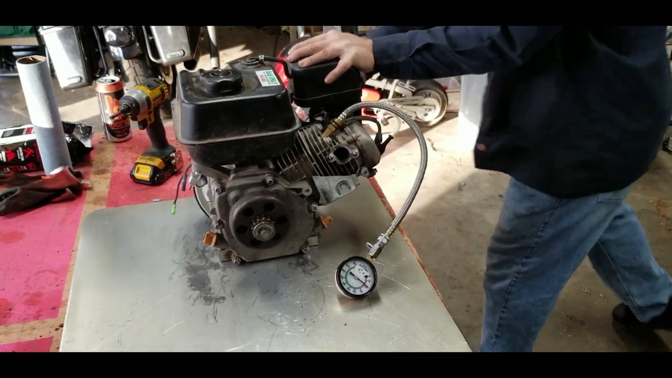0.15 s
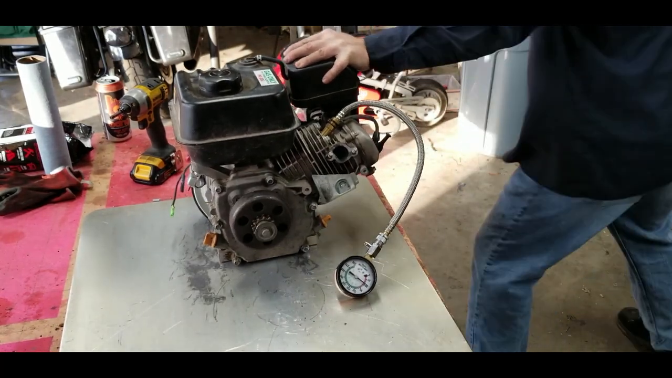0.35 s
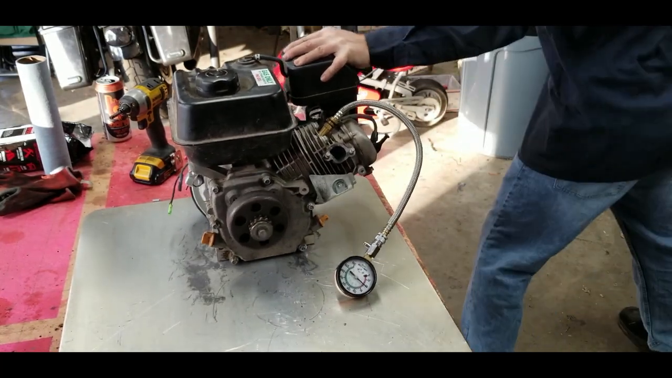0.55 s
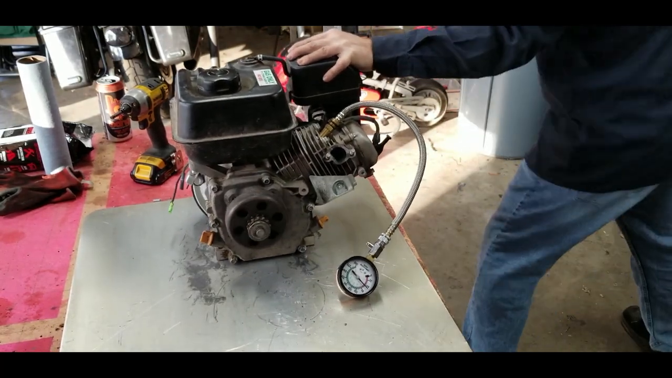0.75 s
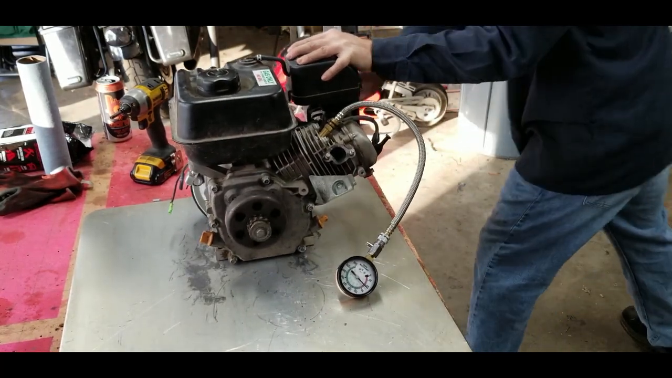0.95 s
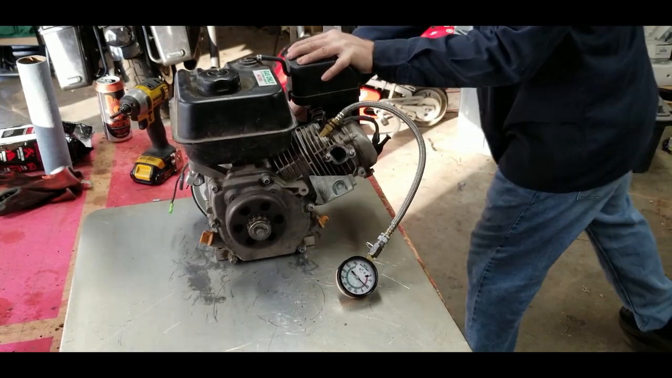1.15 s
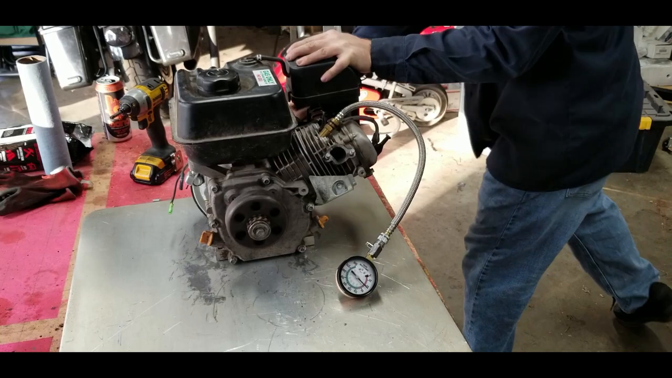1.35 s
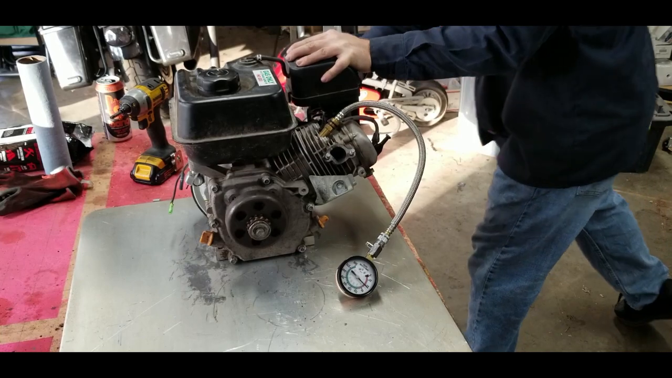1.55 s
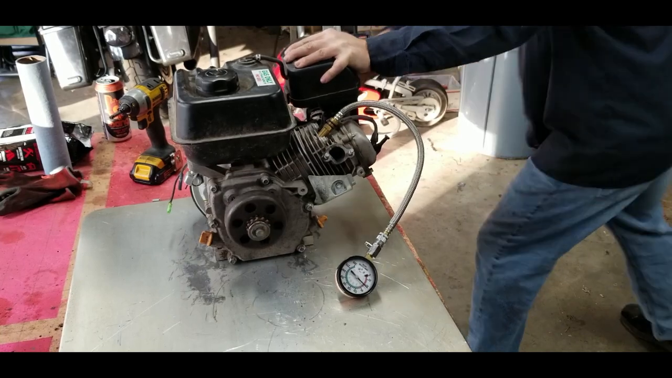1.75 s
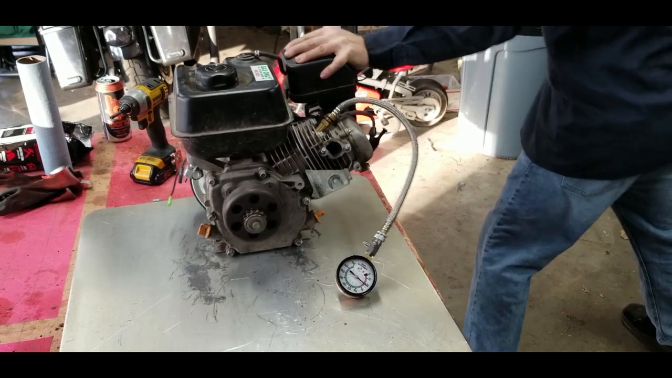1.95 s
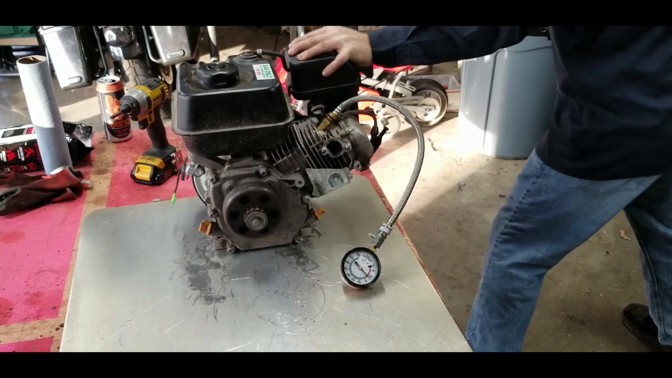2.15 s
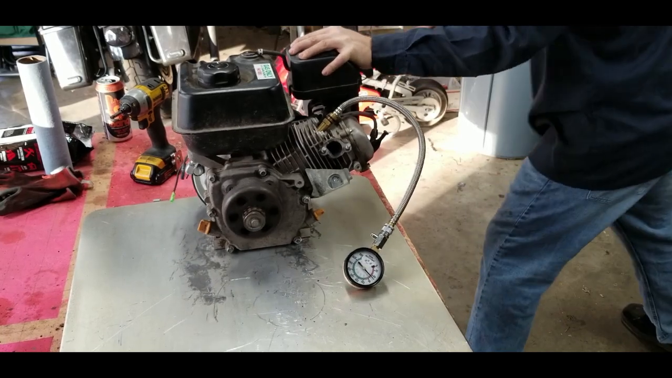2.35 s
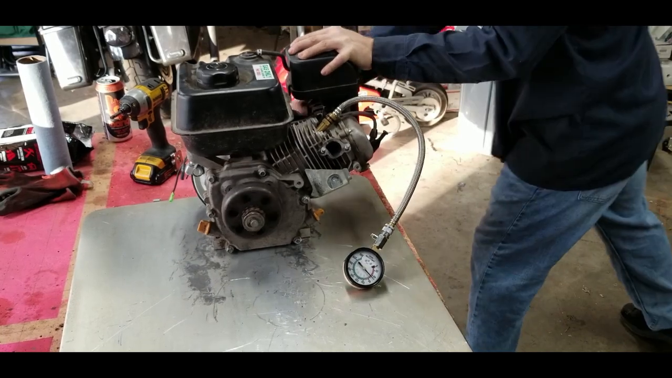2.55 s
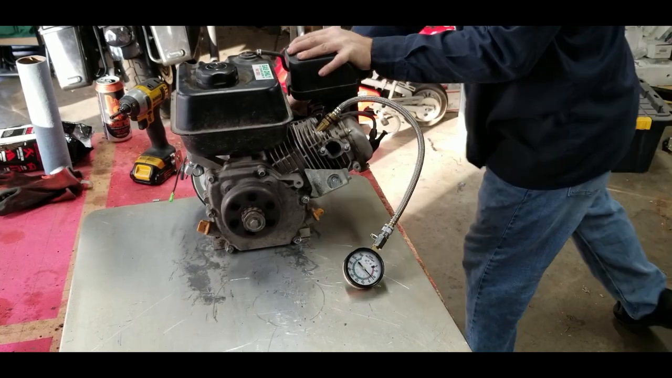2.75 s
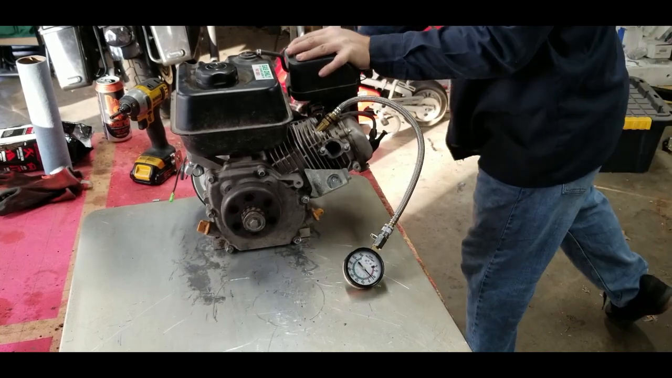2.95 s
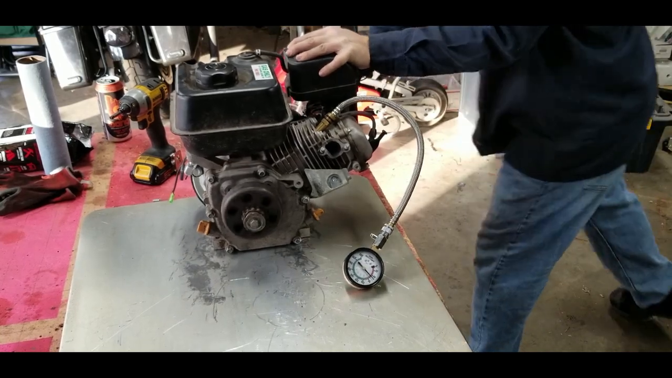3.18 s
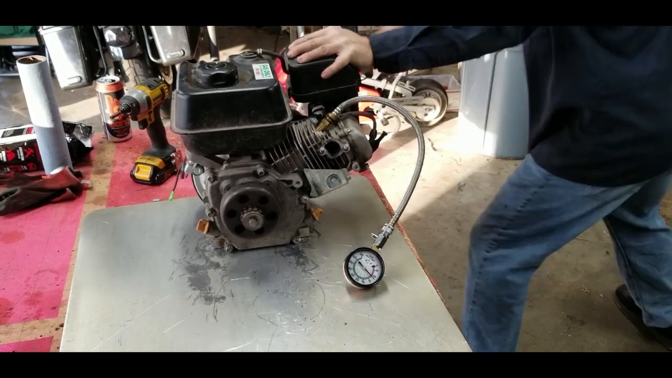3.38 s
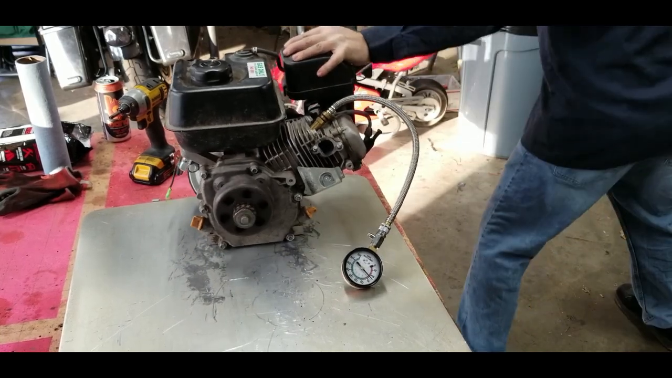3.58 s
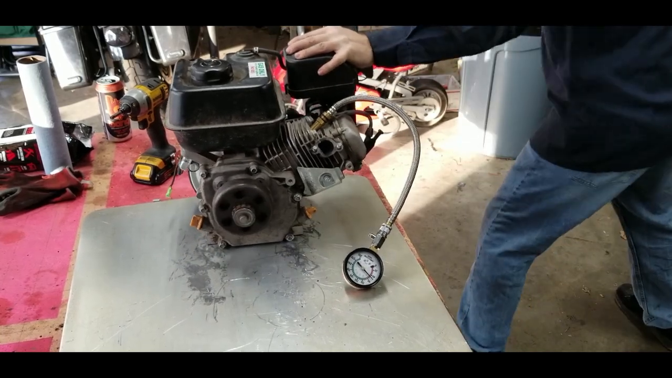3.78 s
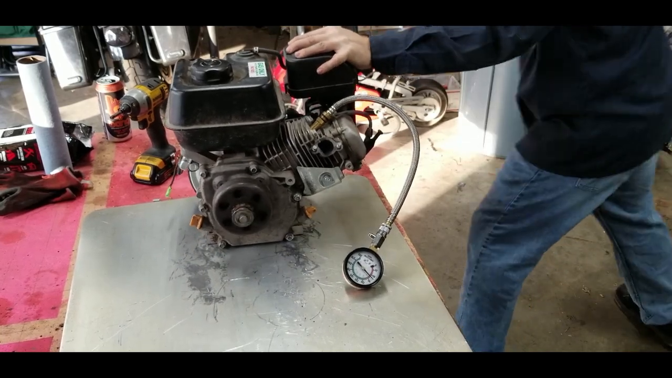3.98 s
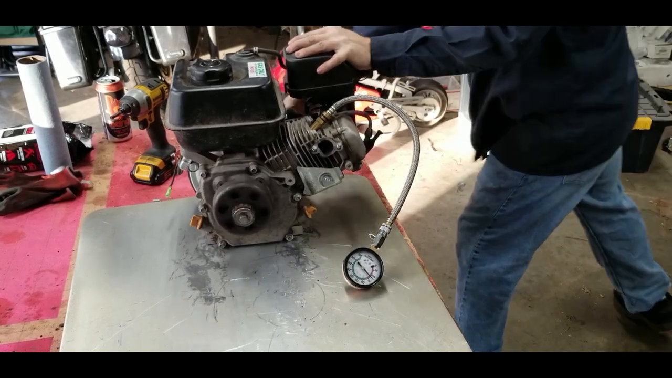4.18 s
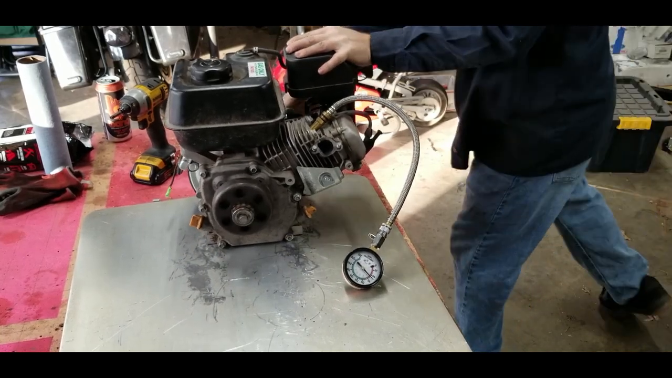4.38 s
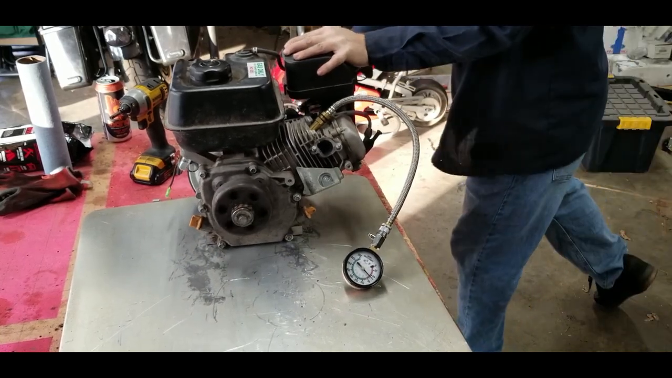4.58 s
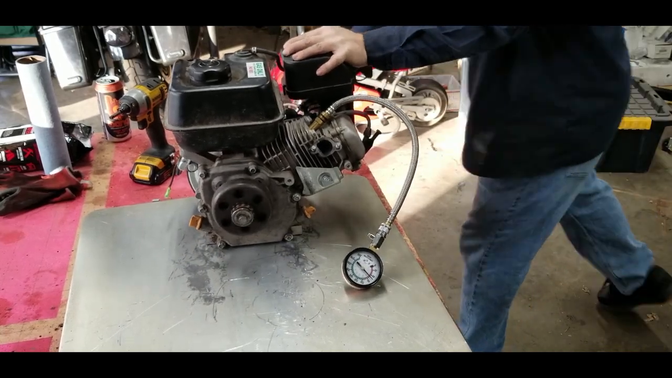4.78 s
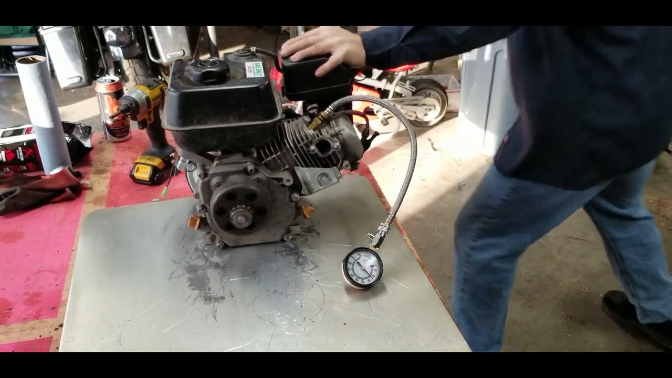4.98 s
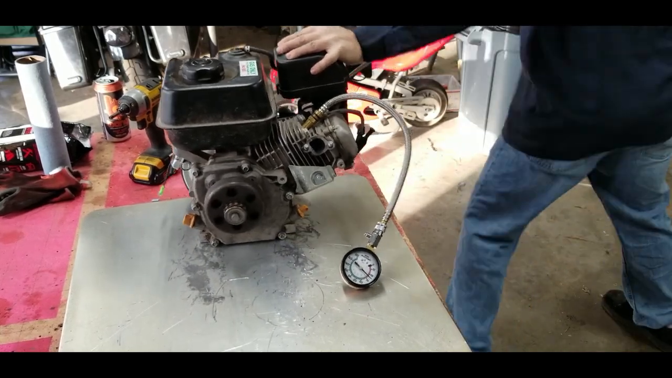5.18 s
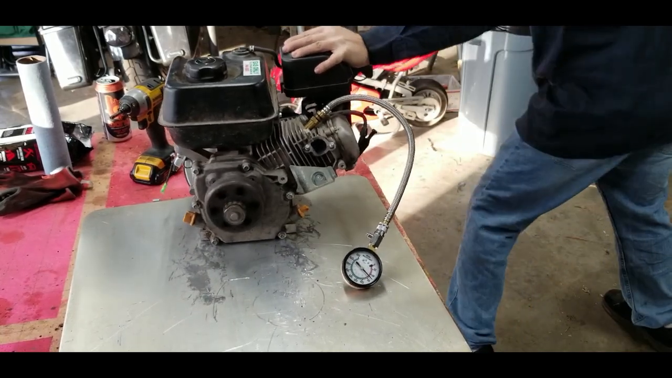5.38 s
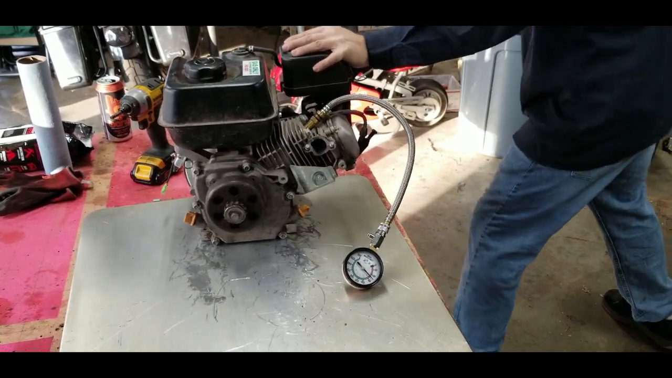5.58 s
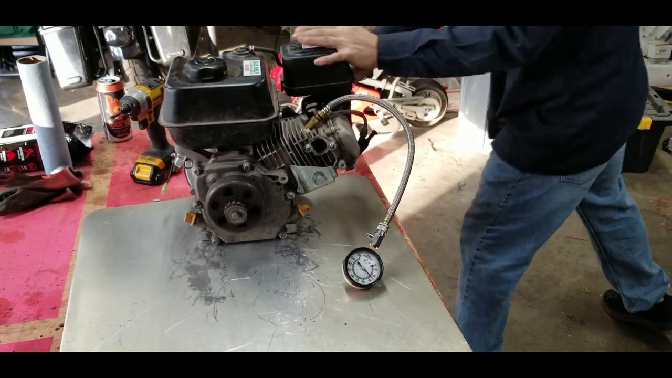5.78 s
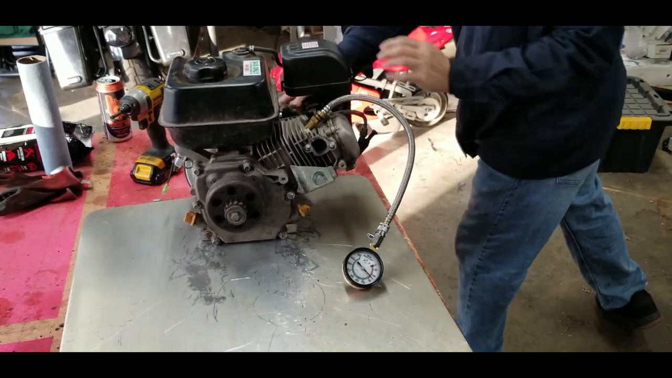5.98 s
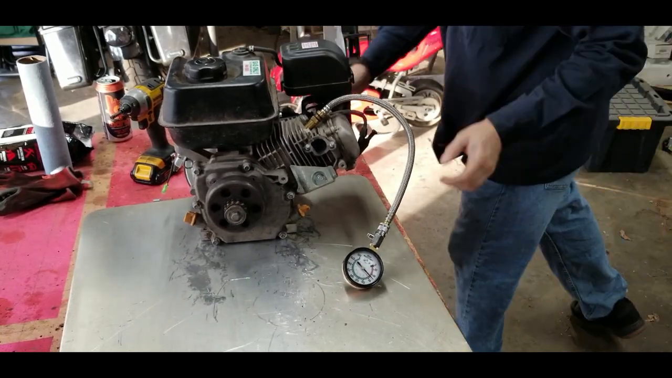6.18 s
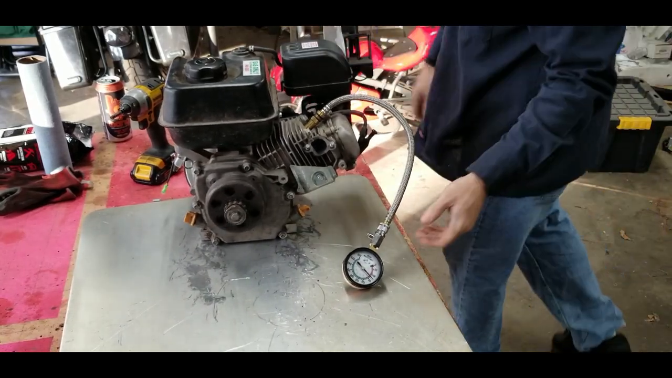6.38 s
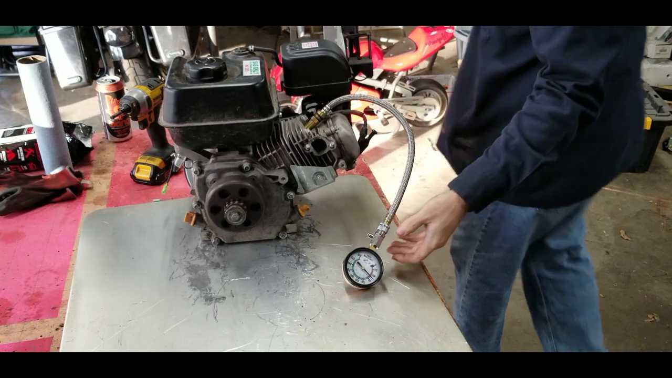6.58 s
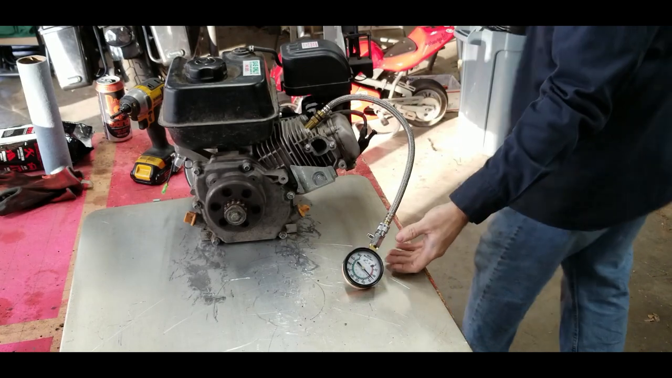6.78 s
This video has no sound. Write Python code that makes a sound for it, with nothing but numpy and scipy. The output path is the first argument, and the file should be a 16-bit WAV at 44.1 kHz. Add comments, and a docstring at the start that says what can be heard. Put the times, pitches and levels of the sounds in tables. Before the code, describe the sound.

A zip of rope starts a small engine turning over with a metallic rattle, three or four low puffs and a sharp hiss of air. It winds down with clacks and clinks without starting, and the handle taps back against its housing. This happens four times at an even pace, ending on a much harder knock. The microphone is nearby, with the engine slightly to the right, over faint room air and short workshop reverberation.

```python
"""A small single-cylinder engine is cranked four times for a compression test; it never fires.
A rustle fades over room air and a faint hum. At each pull the rope zips out, the works spin up and the
pawls catch; the cylinder puffs three or four times, and one gush of air sets the cooling fins ringing.
Clacking and clinking, the engine coasts down; the rope rewinds and the handle knocks home, hardest
after the last pull. A hard-walled workshop reverberates."""
import sys
import numpy as np
from scipy import signal
from scipy.fft import rfft, irfft, next_fast_len
from scipy.io import wavfile

SR = 44100
rng = np.random.default_rng(int(sys.argv[2]) if len(sys.argv) > 2 else 0)


def transcribe(signal):
    """Save signal, clipped to [-1, 1], as a 16-bit WAV file at the path in sys.argv[1]."""
    frames = np.atleast_2d(signal).T
    limited = np.clip(frames, -1, 1)
    pcm = np.round(limited * 32767).astype(np.int16)
    wavfile.write(sys.argv[1], SR, pcm)


N = 301423


def amp(db):
    """Decibels to amplitude ratio."""
    return 10 ** (np.asarray(db) / 20)

def unit(x):
    """Normalisation to rms 1."""
    return x / np.sqrt(np.mean(x ** 2) + 1e-20)

def along(points, hz):
    """Interpolation of (frequency_hz, value) points on a log frequency axis."""
    f, v = np.transpose(points)
    return np.interp(np.log(hz + 1), np.log(f + 1), v)

def filtered(x, response):
    """Linear filtering: the spectrum of x times a frequency response."""
    size = x.shape[-1]
    padded = next_fast_len(size + 8192)
    return irfft(rfft(x, padded) * response(np.fft.rfftfreq(padded, 1 / SR)), padded)[..., :size]

def noise(spectrum, spread):
    """Partly coherent stereo noise of a given spectrum, at rms 1; spread weights each side's own part."""
    white = rng.standard_normal(N) + spread * rng.standard_normal((2, N))
    return unit(filtered(white, lambda hz: amp(along(spectrum, hz))))

def add(track, start_s, sound):
    """Superposition of a sound on a track."""
    start = max(round(start_s * SR), 0)
    part = track[..., start:start + sound.shape[-1]]
    part += sound[..., :part.shape[-1]]

def bursts(times, levels_db, t60_s, rise_s):
    """Incoherent addition: the envelope of decaying blows whose powers sum."""
    power, t = np.zeros(N), np.arange(SR) / SR
    shape = (1 - np.exp(-(t / rise_s) ** 2)) * amp(-60 * t / t60_s)
    for s, db in np.broadcast(times, levels_db):
        add(power, s, (amp(db) * shape / shape.max()) ** 2)
    return np.sqrt(power)

def ring(modes, onset_s=0.00082, stretch=1, uneven_db=0):
    """Modal impulse response: damped sinusoids, with random phases on each side."""
    t = np.arange(SR) / SR
    tones = np.zeros((2, SR))
    for hz, db, t60 in modes:
        phase = 2 * np.pi * hz * stretch * t + rng.normal(0, 1.0, (2, 1))
        tones += amp(db + uneven_db * rng.standard_normal() - 60 * t / t60) * np.sin(phase)
    return tones * (1 - np.exp(-(t / onset_s) ** 2))

def ringing(x, modes):
    """Forced vibration: the response of the modes to x, scaled to the strength of x."""
    return unit(signal.fftconvolve(x, ring(modes), axes=1)[:, :N]) * x.std()

def struck(blows, modes, onset_s, detune, uneven_db):
    """Free vibration: each blow lands on a new spot and excites the modes at new strengths."""
    out = np.zeros((2, N))
    for s, db in blows:
        sound = ring(modes, onset_s, 1 + detune * rng.standard_normal(), uneven_db)
        add(out, s, amp(db) * sound / np.abs(sound).max())
    return out


# spectra of room air, dull contact and bright hiss: frequency_hz, density_db
AIR_SPECTRUM = [(20, -18.5), (80, 3.5), (130, -5.5), (300, -9), (600, -12.5), (1000, -34), (2000, -31.5),
                (3200, -24), (8000, -26), (16000, -33)]
DULL_SPECTRUM = [(100, -21), (300, -12), (550, -3.5), (1400, -17), (2200, -16), (5000, -20), (14000, -31.5)]
BRIGHT_SPECTRUM = [(4000, -31.5), (6500, -2), (8400, -1.5), (9500, 5), (12000, 4.5), (16000, -4)]
# envelope of the hum: time_s, level_db
HUM_LEVELS = [(0, -64), (6, -75), (6.13, -60), (6.74, -61.5), (6.8, -72)]

def background(hum_hz=219, rustle_t60_s=0.53):
    """Noise floor: steady room air, a faint pure tone and an exponentially decaying rustle."""
    t = np.arange(N) / SR
    air = amp(-62) * noise(AIR_SPECTRUM, spread=0.46)
    hum = amp(np.interp(t, *np.transpose(HUM_LEVELS))) * np.sin(2 * np.pi * hum_hz * t)
    rustle = amp(-40.5) * noise(DULL_SPECTRUM, spread=1) + amp(-49.5) * noise(BRIGHT_SPECTRUM, spread=.8)
    return air + hum + rustle * amp(-60 * t / rustle_t60_s)


# pulls of the rope: taut_s, catch_s, top_speed_s, effort_db, rope_db, coasting_loss_db_per_s
ROPE_PULLS = [(0.2202, 0.3764, 0.54, 1, -40, 51), (1.699, 1.809, 2.034, -1, -39, 45.5),
              (3.297, 3.3866, 3.585, -2, -41.5, 39.5), (4.902, 5.0386, 5.31, 1, -38, 54)]
# spectrum of small rattling contacts: frequency_hz, density_db
RATTLE_SPECTRUM = [(100, -39), (250, 4), (450, 9.5), (1400, 2.5), (2100, -3.5), (2900, 1.5), (4400, -5.5),
                   (5400, -4.5), (7800, -17), (9800, -9), (13000, -14.5), (16000, -19)]

def rope(top_tick_hz=2100, jitter_hz=230, snap_db=-43):
    """Sliding friction: the rope snaps taut and its braid ticks over the guide, faster with speed."""
    ticks, rub = np.zeros(N), np.zeros(N)
    for start, catch, _, _, db, _ in ROPE_PULLS:
        progress = np.linspace(0, 1, int((catch - start) * SR))
        tick_hz = top_tick_hz * (.25 + .75 * np.sin(progress * np.pi / 2))
        phase = 2 * np.pi * np.cumsum(tick_hz) / SR
        braid = np.sin(phase) + 0.29 * np.sin(2 * phase)
        uneven = unit(filtered(rng.standard_normal(SR // 2), lambda hz: np.exp(-(hz / jitter_hz) ** 2)))
        level = amp(db) * np.sqrt(progress) * np.clip(8 * (1 - progress), 0, 1)
        add(ticks, start, level * np.sqrt(progress) * uneven[:len(progress)] * braid)
        add(rub, start, level)
    snap = bursts([pull[0] for pull in ROPE_PULLS], snap_db, t60_s=0.073, rise_s=0.0021)
    rasp = amp(-1) * noise(DULL_SPECTRUM, spread=1) + amp(-20) * noise(RATTLE_SPECTRUM, spread=.8)
    return ticks + np.hypot(rub, snap) * rasp


def works(impacts_per_s=190, grain_s=.0025):
    """Impact noise: reel, gears and fan rattle and the crankcase shakes the bench, louder with speed."""
    engage_s, hold_s, coast_s, stop_s = .07, 0.028, 0.5, .4
    engage_db, spin_up_db = 28, 4.5  # rises before and after the pawls catch
    t, drive = np.arange(N) / SR, np.zeros(N)
    for _, catch, top, effort_db, _, loss in ROPE_PULLS:
        start, slow = catch - engage_s, top + hold_s + coast_s
        speed_db = np.interp(t, [start, catch, top, top + hold_s, slow],
                             [-spin_up_db - engage_db, -spin_up_db, 0, 0, -loss * coast_s])
        turning = np.interp(t, [start - .02, start, slow, slow + stop_s], [0, 1, 1, 0])
        drive += turning * amp(effort_db + speed_db)
    impacts = (rng.random(N) < impacts_per_s / SR) * amp(4 * rng.standard_normal(N).clip(-2, 2))
    grain = unit(.2 + signal.lfilter([1], [1, -np.exp(-1 / (grain_s * SR))], impacts))
    rattle = amp(-28) * drive * grain * noise(RATTLE_SPECTRUM, spread=0.46)
    return rattle, bench_rumble(drive)


# spectrum of the shaken bench: frequency_hz, density_db
RUMBLE_SPECTRUM = [(20, -24), (45, -8), (100, -2.5), (170, -4), (260, -2.5), (450, -24), (1500, -99.5)]

def bench_rumble(drive):
    """Structure-borne sound: the bench radiates low noise in proportion to its drive."""
    return amp(-30.5) * drive * noise(RUMBLE_SPECTRUM, spread=0.35)


# clacks of valve gear and reel: start_s, level_db
CLACK_BLOWS = [(.406, -13), (.707, -14.5), (1.8968, -8), (1.9237, -6), (2.2772, -18.5), (2.3363, -20.5),
               (2.541, -30.5), (3.5456, -8.5), (3.6973, -10.5), (3.912, -20), (3.9932, -24.5),
               (5.3294, -10.5), (5.5627, -21.5), (5.6762, -29.5), (5.8943, -31.5)]
# spectrum of a clack: frequency_hz, density_db
CLACK_SPECTRUM = [(900, -5.5), (2000, -7), (2900, -4.5), (4400, 0.5), (5500, -10.5), (7500, -24),
                  (12000, -52.5)]

def clacks(catch_db=-11, early_s=0.0006):
    """Broadband transients: pawls catch, and valve gear and reel strike in clusters of metal contacts."""
    catches = [(catch, catch_db + effort_db) for _, catch, _, effort_db, _, _ in ROPE_PULLS]
    times, db = np.transpose(CLACK_BLOWS + catches)
    clack = amp(-11) * noise(CLACK_SPECTRUM, spread=1)
    edge = amp(-15) * noise(BRIGHT_SPECTRUM, spread=0.87)
    knock = amp(-20.5) * noise(DULL_SPECTRUM, spread=0.22)
    return bursts(times - early_s, db, t60_s=0.14, rise_s=0.0021) * (clack + edge + knock)


# crankcase modes: pitch_hz, level_db, t60_s
CRANKCASE_MODES = [(1532, -0.5, 0.017), (2132, -8.5, 0.077), (3058, 1.5, 0.026), (3398, -6.5, 0.033),
                   (4547, -0.5, 0.02), (7000, -12, .04), (9800, -9.5, .012), (11800, -10.5, 0.022)]

def crankcase(contacts):
    """Resonance: metal contacts drive the modes of the crankcase."""
    return amp(-7) * ringing(contacts, CRANKCASE_MODES)


# releases of the cylinder's charge: start_s, level_db
CYLINDER_PUFFS = [(0.4406, -9.5), (0.5904, -12), (0.804, -17.5), (1.8254, -11), (1.9821, -10),
                  (2.141, -13.5), (2.4, -26), (3.4633, -13.5), (3.602, -14.5), (3.7677, -13),
                  (3.902, -26.5), (5.096, -10.5), (5.2337, -9.5), (5.4074, -13)]

def puffs(cavity_hz=260, bench_hz=178, t60_s=0.15, lead_s=.007):
    """Cavity resonance: the valve spits, then one pressure swing leaves muffler and bench ringing."""
    out = np.zeros(N)
    t = np.arange(SR // 3) / SR - lead_s
    swing = -np.exp(-(t / .0011) ** 2) + .75 * np.exp(-((t - .0024) / .0013) ** 2)
    swell = np.clip(t / 0.0036 + .5, 0, 1)
    boom = -np.cos(2 * np.pi * bench_hz * t) * amp(-20 - 60 * t / t60_s)
    times, puff_db = np.transpose(CYLINDER_PUFFS)
    for s, db, detune in zip(times, puff_db, rng.normal(0, 0.0073, len(times))):
        cavity = -np.cos(2 * np.pi * cavity_hz * (1 + detune) * t) * amp(-3.5 - 60 * t / t60_s)
        add(out, s - lead_s, amp(db) * (amp(-3) * swing + swell * (cavity + boom)))
    speeding_up = [any(catch < s < top for _, catch, top, *_ in ROPE_PULLS) for s in times]
    spit_db = puff_db + np.where(speeding_up, -10.5, -15)
    spit = bursts(times - lead_s, spit_db, t60_s=0.054, rise_s=0.00061)
    return out, spit * noise(BRIGHT_SPECTRUM, spread=0.92)


# gushes of air, one near each pull's top speed: start_s, level_db
AIR_GUSHES = [(.531, -10.5), (1.998, -12), (3.583, -12), (5.177, -12)]
# spectrum of a broad hiss: frequency_hz, density_db
HISS_SPECTRUM = [(100, -14.5), (500, -6.5), (1400, -1), (2100, -5), (3000, -1.5), (5600, -5.5), (7300, -10),
                 (7850, -6), (8400, -11), (9500, -6.5), (12200, -6), (13500, -11), (14200, -6.5),
                 (16000, -5.5)]
# air passage modes: pitch_hz, level_db, t60_s
PASSAGE_MODES = [(780, -5, 0.05), (1340, -8.5, 0.039), (3170, 6.5, 0.025), (5460, -7, 0.16),
                 (5690, -2.5, 0.036), (6280, 3.5, 0.014), (8000, -12, 0.013), (9100, -5, 0.059),
                 (12000, -5.5, .035), (13000, -3.5, 0.012), (15500, 1, 0.008)]

def gushes():
    """Jet noise: air hisses through a valve, rings its passage and fades as the pressure evens out."""
    times, db = np.transpose(AIR_GUSHES)
    jet = bursts(times, db, t60_s=0.37, rise_s=0.0035) * noise(HISS_SPECTRUM, spread=.9)
    return amp(-2.5) * jet + amp(-12) * ringing(jet, PASSAGE_MODES)


# cooling fin modes: pitch_hz, level_db, t60_s
FIN_MODES = [(3020, -2.5, 0.7), (3079, -3.5, 1.15), (4430, -8.5, 0.39), (5530, -5, 0.68),
             (5700, -9.5, 0.32)]

def fins(clatter):
    """Sympathetic vibration: each gush, and more weakly the clatter, rings the lightly damped fins."""
    blown = struck(AIR_GUSHES, FIN_MODES, onset_s=.03, detune=.001, uneven_db=1.5)
    return amp(-10) * blown + amp(-24) * ringing(clatter, FIN_MODES)


# clinks of a loose starter pawl: start_s, level_db
PAWL_CLINKS = [(.7593, -15), (.9274, -33.5), (1.7755, -16), (1.955, -8), (2.0702, -7.5), (3.3288, -24),
               (3.431, -11.5), (3.4988, -15.5), (4.0475, -19), (5.2252, -6.5), (5.8288, -22)]
# pawl modes: pitch_hz, level_db, t60_s
PAWL_MODES = [(2940, -0.5, 0.017), (4353, -9, 0.032), (6700, -12, 0.0097), (9830, -13, 0.012),
              (13200, -18.5, 0.005)]

def pawl():
    """Impact excitation: a loose pawl pings briefly, with a scrape of steel on steel."""
    times, db = np.transpose(PAWL_CLINKS)
    ping = struck(PAWL_CLINKS, PAWL_MODES, onset_s=.0015, detune=.025, uneven_db=3)
    scrape = bursts(times, db, t60_s=0.026, rise_s=0.0025) * noise(RATTLE_SPECTRUM, spread=.6)
    return amp(-3) * ping + amp(-11) * scrape


# jerks as the reel takes up slack: start_s, jingle_db, knock_db
REEL_JERKS = [(1.017, -58, -53), (1.310, -39.5, -45), (1.419, -41.5, -36), (2.882, -42.5, -45),
              (2.955, -42.5, -39.5), (4.134, -44.5, -46), (4.479, -47, -50), (4.568, -49, -43.5)]
# recoil spring modes: pitch_hz, level_db, t60_s
SPRING_MODES = [(3050, -3, .15), (5650, -13.5, 0.087), (8030, -1, 0.048), (8640, -2, 0.047),
                (9400, -2.5, 0.064), (10050, -6, 0.032), (14300, -12, 0.024)]

def rewind():
    """Impulsive loading: the rope jerks the reel, which knocks and ticks; the tick rings its spring."""
    times, jingle_db, knock_db = np.transpose(REEL_JERKS)
    tick = bursts(times, jingle_db, t60_s=0.048, rise_s=0.0018) * noise(BRIGHT_SPECTRUM, spread=.9)
    knock = bursts(times, knock_db - 3.5, t60_s=0.32, rise_s=.003) * noise(RATTLE_SPECTRUM, spread=0.63)
    thud = bursts(times, knock_db + 3.5, t60_s=0.077, rise_s=0.001) * noise(DULL_SPECTRUM, spread=0.17)
    return tick + amp(4.5) * ringing(tick, SPRING_MODES) + knock + thud


# landings of the handle on the starter housing: start_s, level_db
HANDLE_LANDINGS = [(1.131, -31.5), (2.608, -23.5), (4.209, -27), (6, -14.5)]
# spectrum of the slap: frequency_hz, density_db
SLAP_SPECTRUM = [(150, -35.5), (350, -24), (540, -1), (800, -2.5), (1500, -4.5), (2100, -8.5), (3000, -7),
                 (5400, -19), (8000, -34), (16000, -31.5)]
# starter housing modes: pitch_hz, level_db, t60_s
HOUSING_MODES = [(520.4, 4, 0.063), (618, -1.5, 0.08), (772, -27.5, 0.13), (777.8, 4, 0.095),
                 (969, -1.5, .07), (1244, -1, 0.11), (1543, 1, 0.07), (1930, -5, 0.026), (2940, -7, 0.044)]

def handle(rock_s=0.0074):
    """Shell vibration: the handle slaps the housing, rocks once more and leaves it ringing."""
    times, db = np.transpose(HANDLE_LANDINGS)
    first = bursts(times, db - 6, t60_s=0.062, rise_s=0.0005)
    second = bursts(times + rock_s, db - 5.5, t60_s=0.17, rise_s=0.002)
    slap = np.hypot(first, second) * noise(SLAP_SPECTRUM, spread=0.99)
    crack_db = 2 * db - db.max() - 16  # square law: only a hard landing cracks brightly
    crack = bursts(times, crack_db, t60_s=0.33, rise_s=.001) * noise(HISS_SPECTRUM, spread=1)
    shell = struck(HANDLE_LANDINGS, HOUSING_MODES, onset_s=0.0072, detune=0.0066, uneven_db=-1.5)
    return slap + crack + amp(6) * shell


def bench_echoes(x, echo_db=-14, count=6):
    """Early reflections: the steel bench top and its clutter return close echoes to each side."""
    taps = np.zeros((2, SR // 100))
    taps[:, 0] = 1
    for side in taps:
        side[rng.integers(20, len(side), count)] = amp(echo_db) * rng.choice([-1, 1], count)
    return signal.fftconvolve(x, taps / np.linalg.norm(taps[0]), axes=1)[:, :N]


# reverberation times of the workshop: frequency_hz, t60_s
ROOM_DECAY = [(80, 0.9), (250, 0.36), (450, .5), (720, 0.64), (1100, 0.46), (3000, 0.5), (8000, 0.48),
              (16000, 0.18)]

def workshop(x, build_s=0.021):
    """Diffuse reverberation: a noise tail for each side, each frequency decaying at its own rate."""
    hz, t, spectra = signal.stft(rng.standard_normal((2, SR)), SR, nperseg=256)
    decay = amp(-60 * t / along(ROOM_DECAY, hz)[:, None])
    _, tail = signal.istft(spectra * decay, SR, nperseg=256)
    tail *= np.clip(np.arange(tail.shape[1]) / SR / build_s, 0, 1)
    return signal.fftconvolve(x, tail / np.linalg.norm(tail[0]), axes=1)[:, :N]


# stereo balance: frequency_hz, left_minus_right_db
STEREO_BALANCE = [(60, 0.5), (250, -3), (600, -5), (3500, -7.5), (6000, -7.5), (8000, -2.5), (12000, -5)]

def direction(hz, lead_s=2 / SR):
    """Level and phase cues: louder on the right above the deep bass, slightly earlier on the left."""
    side = np.array([[.5], [-.5]])
    phase = np.minimum(2 * np.pi * hz * lead_s, np.pi / 2)
    return amp(side * along(STEREO_BALANCE, hz)) * np.exp(1j * phase * side)


def scene():
    """Superposition: the direct sound of engine, rope and handle plus the reverberant field."""
    rattle, rumble = works()
    puff, spit = puffs()
    contacts = rattle + clacks()
    metal = bench_echoes(contacts + crankcase(contacts) + spit) + rewind()
    hiss = gushes() + rope()
    low = puff + rumble
    knock = handle()
    room = workshop(amp(-5) * metal + amp(-10) * hiss + amp(-17.5) * low + amp(-9) * knock)
    sound = metal + pawl() + fins(metal) + hiss + low + knock + room + background()
    return filtered(sound, direction)

def record(dry, bass_hz=65, top_hz=15800):
    """Band limiting: a small microphone thins the deep bass, and nothing above top_hz is kept."""
    return filtered(dry, lambda hz: 1j * hz / (bass_hz + 1j * hz) * (hz < top_hz))


dry = scene()
out = record(dry)
transcribe(out)
```